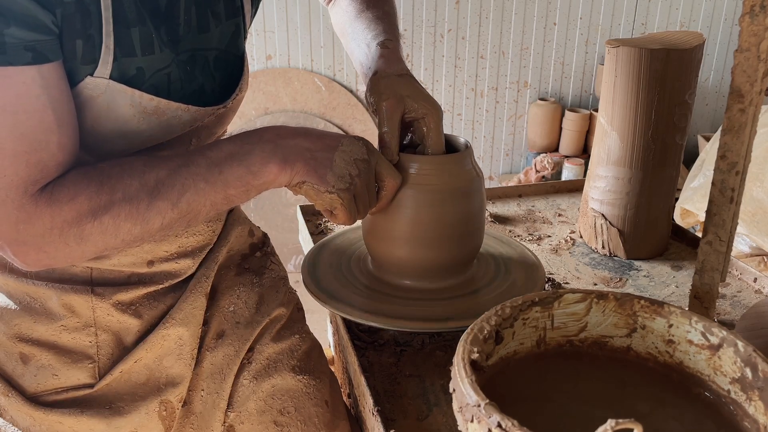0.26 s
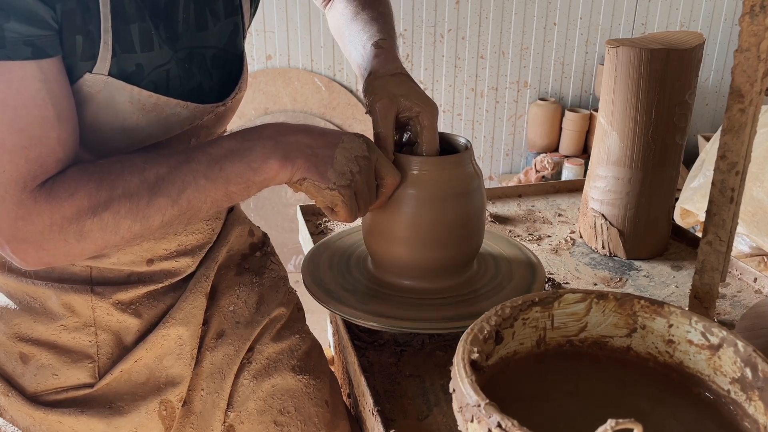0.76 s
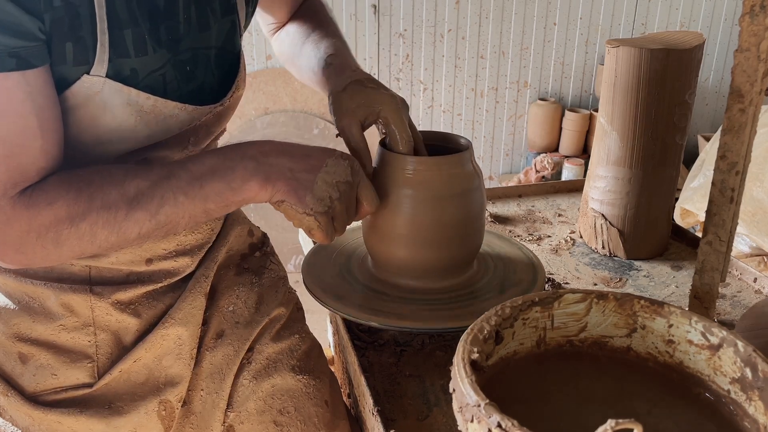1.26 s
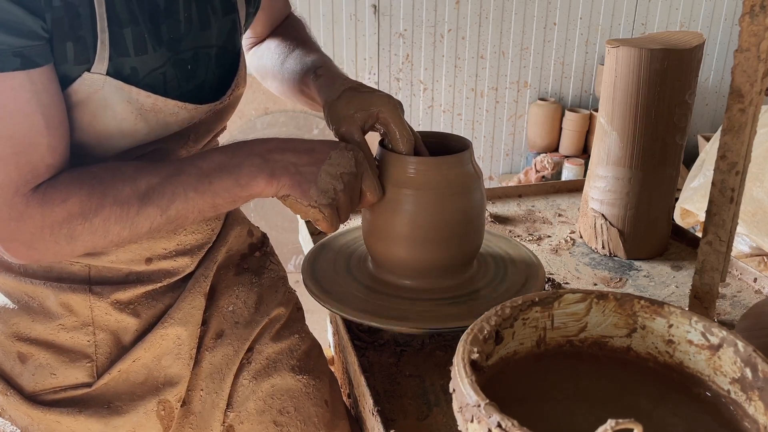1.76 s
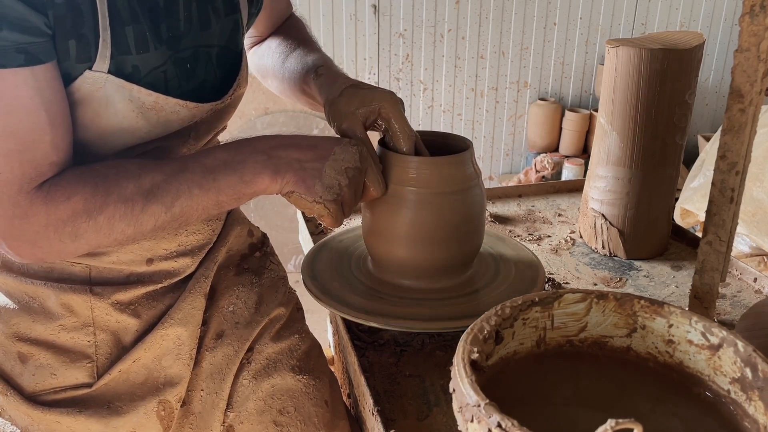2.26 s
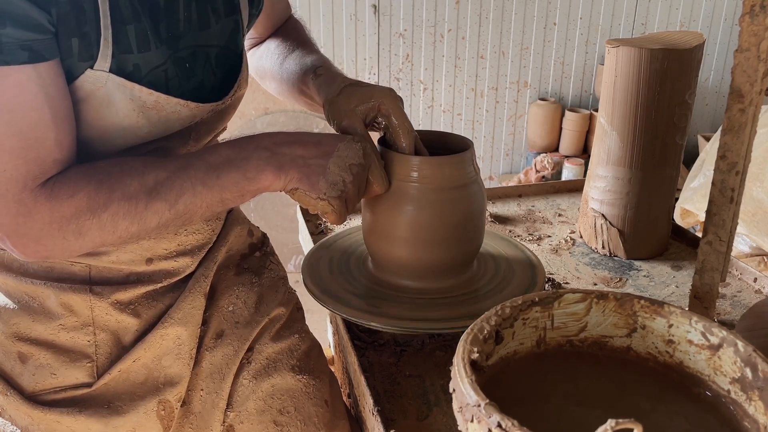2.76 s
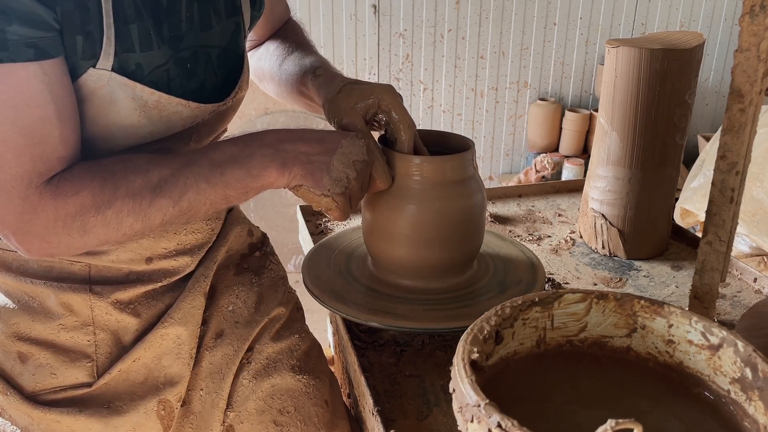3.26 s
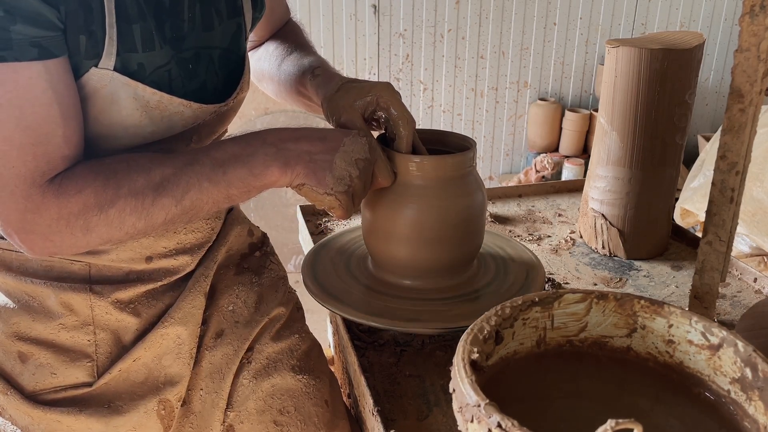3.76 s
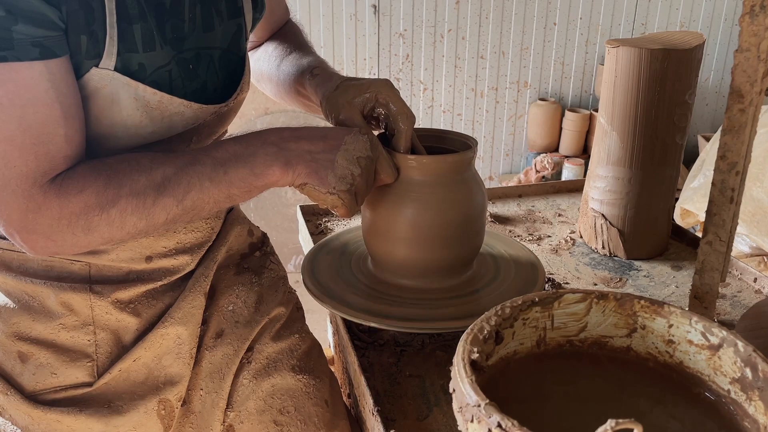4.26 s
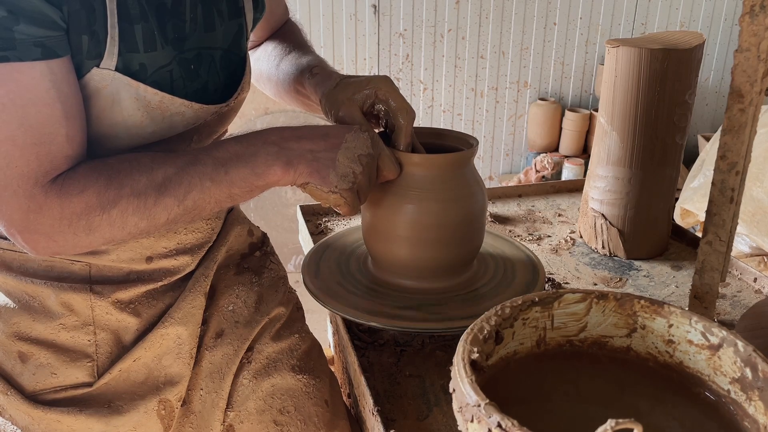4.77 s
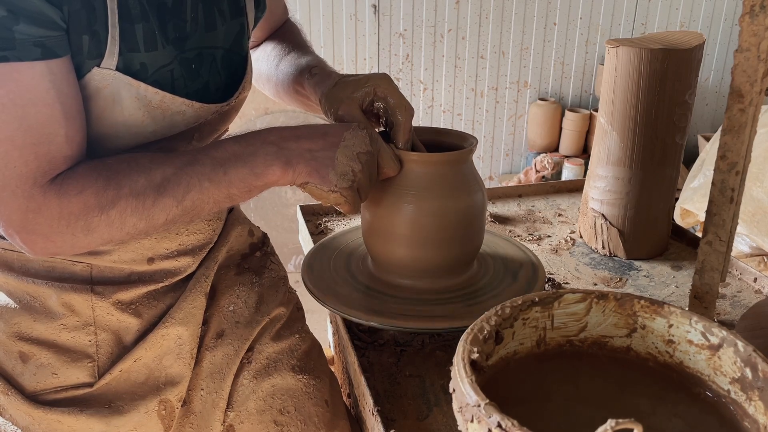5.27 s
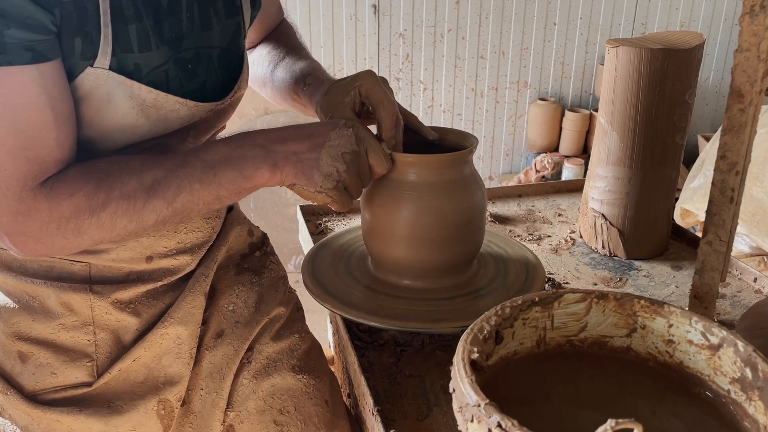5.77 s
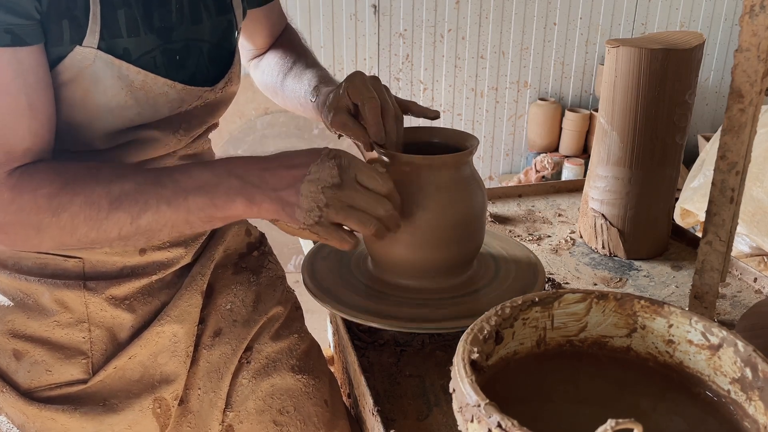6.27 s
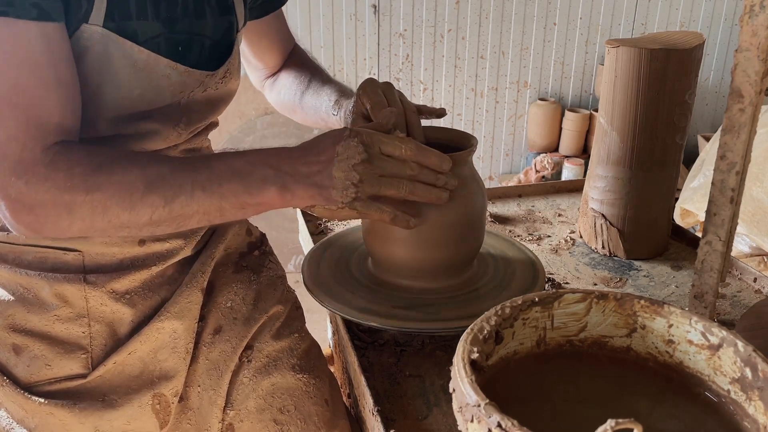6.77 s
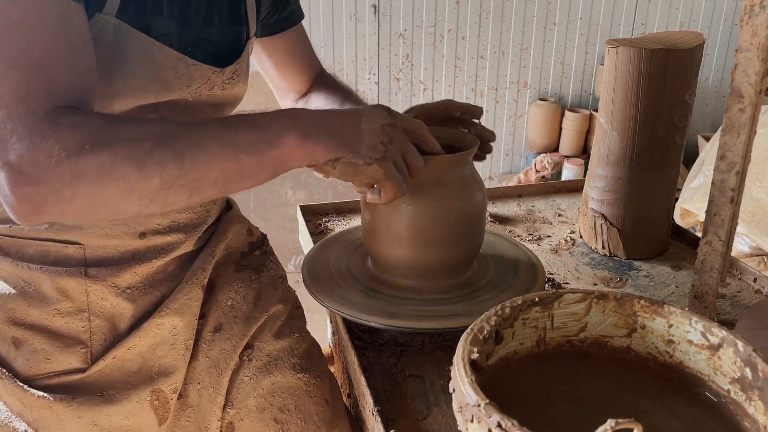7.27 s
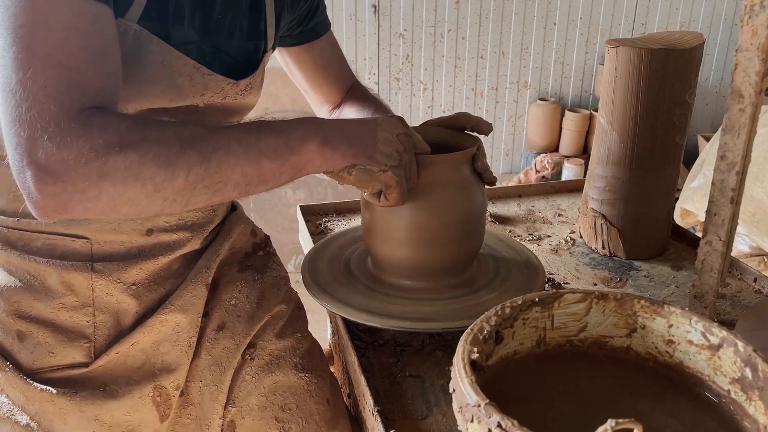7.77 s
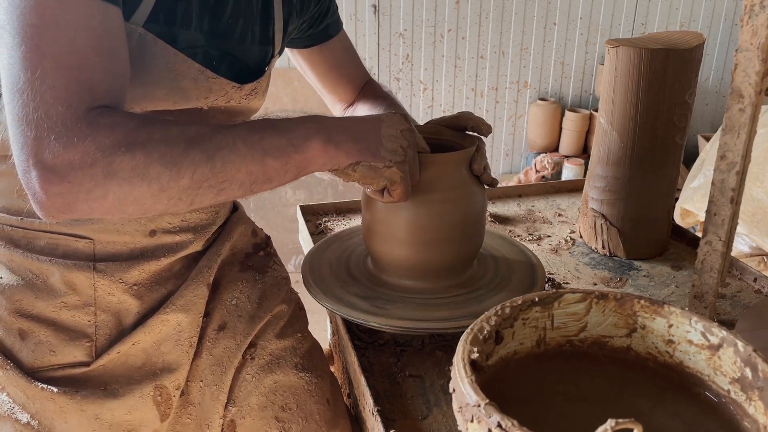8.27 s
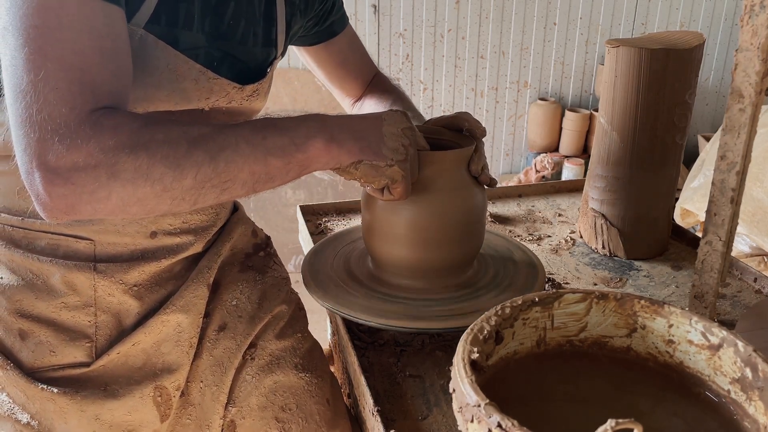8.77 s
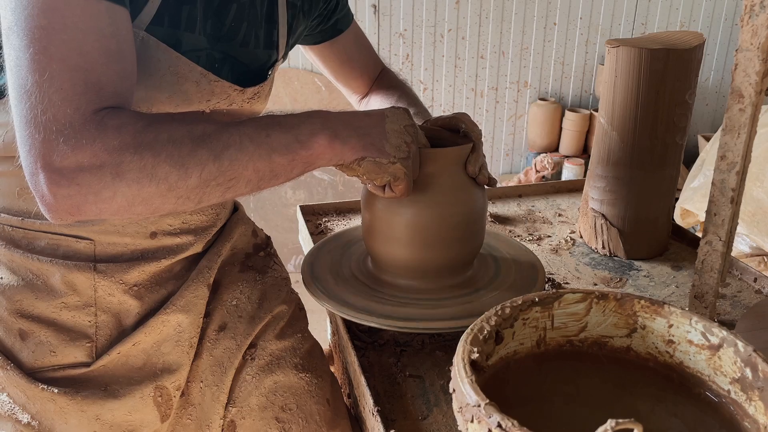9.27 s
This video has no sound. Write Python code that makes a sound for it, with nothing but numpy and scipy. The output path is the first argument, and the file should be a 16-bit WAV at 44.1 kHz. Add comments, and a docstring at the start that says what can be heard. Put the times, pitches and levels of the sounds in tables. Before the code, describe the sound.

An electric pottery wheel hums and whirrs steadily while wet fingers swish and sizzle rhythmically against turning clay in a workshop.

```python
"""Electric potter's wheel running steadily in a workshop while wet hands shape a pot.
Motor: sines on multiples of shaft speed plus mains hum; drive and bearings: noise through resonances.
Clay: filtered noise swishing under the fingers, a thin sizzle and short wet rubs about 2.5 times a second,
now and then a caught lump. Near the end the hands close round the neck and the wheel turns a little faster.
Background: faint, slightly restless workshop hiss."""
import sys
import numpy as np
from scipy import signal
from scipy.fft import rfft, irfft
from scipy.io import wavfile

SR = 44100
rng = np.random.default_rng(int(sys.argv[2]) if len(sys.argv) > 2 else 0)


def generate_wav(sig):
    """Save sig (samples, or channels by samples) to the path in sys.argv[1] as 16-bit PCM at SR."""
    pcm = np.round(np.clip(np.atleast_2d(sig).T, -1, 1) * 32767).astype(np.int16)
    wavfile.write(sys.argv[1], SR, pcm)


N = 420273
TIME_S = np.arange(N) / SR
FREQ_HZ = np.maximum(np.arange(N // 2 + 1) * SR / N, 1)

# Motor hum. Each row: multiple of the shaft speed, level in dB.
HUM_ORDER_DB = [(5, -33.5), (6, -53.5), (8, -35), (9, -74), (10, -48.5), (11, -32.5), (12, -39.5),
                (13, -48.5), (14, -50.5), (16, -50.5), (18, -45), (19, -74), (21, -63.5), (28, -60),
                (32, -65), (35, -65), (37, -71)]
# Belt and bearing tones. Each row: frequency in Hz, level in dB, change when the wheel runs freer in dB.
WHINE_HZ_DB = [(277.8, -36, -8.5), (420, -51.5, -6), (694, -61.5, -6), (877, -64, 5), (927, -65.5, 1),
               (1158.5, -63, -1), (1574, -66, 3), (1644.5, -65.5, 4), (1900, -64.5, 2), (1980.7, -68.5, -5),
               (2032, -68.5, 0), (2080, -72, -5), (2204, -68, -1)]
# Shaft overtone of the loaded motor: multiple of shaft speed, level in dB, change when freer in dB.
LOAD_WHINE_ORDER_DB = (36, -54, -6)
# Mains hum: level in dB of the first and of the second multiple.
MAINS_DB = [-64, -36.5]
# Resonances of frame and tray. Each row: centre in Hz, width in Hz, density in dB per Hz before trim.
FRAME_MODES = [(50, 9, -63.5), (69.5, 8.2, -57), (94.5, 18, -60.5), (111.2, 9.8, -50), (117.3, 15.7, -51.5),
               (138, 5.5, -53.5), (143, 10, -59), (167, 12, -61.5), (180, 11.5, -53), (197, 14, -53),
               (207, 24, -58), (220.5, 3.5, -57.5), (240.8, 14.2, -52.5), (254.5, 21, -56),
               (265.3, 7.1, -50), (280.8, 7.6, -47.5), (292.6, 24.5, -51), (308, 61, -59.5),
               (341.7, 16, -60), (373, 30, -65.5), (406, 12, -69), (419, 9.4, -53.5), (429.6, 11, -53.5),
               (453, 35, -60.5), (471.5, 9.9, -63.5), (480, 11, -68)]
# Resonances of the bearing housing. Each row: centre in Hz, width in Hz, density in dB per Hz before trim.
HOUSING_MODES = [(541, 11, -71.5), (579, 216, -74.5), (612, 26, -76.5), (691, 47, -68.5), (785, 120, -83.5),
                 (845, 52, -76.5), (875.6, 23, -67.5), (940, 45, -73), (1000, 270, -77.5),
                 (1084, 47, -74.5), (1160, 33, -71), (1240, 76, -81), (1315, 66, -75), (1480, 45, -80),
                 (1571, 40, -74), (1651, 106, -75.5), (1905, 52, -77.5), (2030, 94, -77.5),
                 (2250, 390, -88)]
# Rumble and whirr when the wheel runs freer. Each row: frequency in Hz, change in dB.
FAST_HZ_DB = [(70, 1), (115, 4.5), (138, -3), (180, 3.5), (220, -1), (245, 3), (280, -1), (315, 3),
              (450, -0.5), (700, 0), (900, -0.5), (1150, 2.5), (1400, 2), (1490, 5.5), (1580, 1.5),
              (1800, 1.5), (2100, -2.5)]
# Machine bands throbbing with the wheel. Each row: centre in Hz, width in Hz, swells per turn,
# first peak in turns, swing in dB.
THROBS = [(110, 70, 3, .07, .7), (110, 70, 1, .2, .6), (285, 60, 3, .08, .8), (695, 80, 1, .45, 1.6),
          (900, 110, 1, .35, .7), (1160, 70, 3, .02, 2.2)]
# Stereo image of the machine. Each row: frequency in Hz, side minus mid in dB.
SIDE_HZ_DB = [(60, -46), (110, -18), (200, -16.5), (380, -8.5), (700, 2), (1290, 0), (2380, -1), (4400, 22),
              (8120, 13), (15000, 7)]

# Finger strokes along the wall. Each row: start in seconds, length in seconds, level in dB.
STROKES_S_DB = [(-.2, 2.7, -57), (2.803, 1.054, -46.5), (3.66, 0.1, -45.5), (4.376, 0.81, -55.5),
                (5.239, 0.51, -49.5), (5.794, 1.3, -53.5), (6.37, 0.23, -51.5), (7.13, 0.16, -52.5),
                (7.386, 0.2, -45), (9.19, .5, -52)]
# Finger pressure. Each row: time in seconds, sizzle level in dB.
PRESS_S_DB = [(0, -47), (.8, -48), (1.6, -43.5), (2, -39), (2.8, -43), (3.2, -45.5), (3.6, -43.5),
              (4.4, -42), (5.2, -37.5), (5.6, -38), (6.4, -43), (6.8, -41.5), (7.15, -43), (7.55, -47),
              (7.85, -60), (9.53, -62)]
# Lumps caught under the finger. Each row: start in seconds, body level in dB before trim,
# length in seconds, level of the crisp start in dB.
CATCHES = [(.066, -48, .059, -53), (1.322, -51, .03, -42), (1.618, -52, .034, -58),
           (1.717, -40.5, .055, -41), (2.03, -47, .036, -51), (2.122, -42, .046, -40),
           (2.527, -44.5, .039, -47), (4.506, -47, .053, -52), (4.905, -40, .043, -39.5),
           (5.312, -43.5, .04, -42), (5.716, -43, .054, -46), (6.02, -44, .035, -56),
           (6.523, -46, .035, -42), (6.914, -48, .033, -49), (7.298, -40.5, .035, -47),
           (7.35, -43, .2, -50), (7.612, -52, .05, -49), (7.965, -48.5, .09, -48), (8.332, -46, .12, -48),
           (8.702, -47, .11, -46.5), (9.058, -46, .11, -47), (9.41, -47, .08, -45)]
# High spots of the wall. Each row: place in the turn 0-1, length in seconds, level on the belly in dB,
# level on the neck in dB; both levels before pressure and trim.
SPOTS = [(.08, .052, -51, -54), (.47, .03, -70, -51), (.71, .03, -60, -48.5), (.89, .05, -55, -60)]
# Both hands round the neck. Each row: time in seconds, sizzle level in dB.
COLLAR_S_DB = [(7.1, -90), (7.3, -58), (7.7, -64), (7.9, -56.5), (8.4, -57), (8.9, -53.5), (9.53, -53)]

# Spectrum of the finger swish. Each row: frequency in Hz, level in dB.
SLIDE_HZ_DB = [(600, -16), (1800, -2), (2800, 0), (4200, -1.5), (5500, -4), (7000, -4), (8300, -8),
               (9500, -7.5), (12000, -11), (13500, -15), (16000, -24)]
# Spectrum of the sizzle. Each row: frequency in Hz, level in dB.
SIZZLE_HZ_DB = [(3000, -36), (6000, -22), (8000, -17), (9500, -20), (11000, -17), (13100, -11),
                (14200, -3.5), (15250, 0), (15700, -1), (16000, -5)]
# Spectrum of dull rubbing. Each row: frequency in Hz, level in dB.
SCRAPE_HZ_DB = [(3000, -24), (4400, -11), (5400, 0), (6700, -1), (8000, -2), (9500, -5), (13000, -9),
                (15200, -13)]
# Spectrum of crisp, wet contact. Each row: frequency in Hz, level in dB.
CRISP_HZ_DB = [(4000, -24), (5500, -9), (8000, -6), (10500, -1.5), (12500, 1), (14000, -5), (16000, -9)]
# Spectrum of the workshop air. Each row: frequency in Hz, level in dB.
AIR_HZ_DB = [(20, 5), (300, 3), (2400, 1), (2750, -2), (3100, -4), (3800, -2), (4300, -6), (4900, -1.5),
             (5800, -6.5), (7400, -5.5), (8200, -45), (9500, -6), (13000, -14), (16000, -21)]
# Hiss at the two microphone ports. Each row: frequency in Hz, phase lead of the left in radians,
# coherence 0-1, left minus right in dB.
PORTS = [(100, 0, .9, 1), (2600, -.5, .6, 2.5), (4000, 0, .6, 2.5), (5000, -.5, .6, 2.5), (6500, .7, .6, 2),
         (8200, 3.1, .9, 0), (9500, 4.8, .85, 0), (11400, 6.3, .85, 0), (13000, 7.4, .7, 0),
         (14700, 9.4, .92, 0), (16000, 9.8, .9, 0)]
# Narrow treble resonances of hollows round the wheel. Each row: centre in Hz, width in Hz, boost in dB.
HOLLOWS_HZ_DB = [(2780, 200, 2), (3400, 200, 2), (4900, 300, 2.5), (5470, 130, 6), (6120, 170, 4),
                 (6950, 250, 2.5), (7950, 200, 3), (10520, 130, 3), (12200, 250, 2), (12860, 130, 4)]
# Early echoes from pot, tray and bucket. Each row: delay in seconds, gain.
ECHOES_S_GAIN = [(.00512, .2), (.01188, .25), (.0192, .15)]

SHAFT_HZ, MAINS_HZ = 24.856, 49.985
SMEAR_RAD = np.pi / 18  # phase delay per squared order: spreads each shaft kick over the turn
BEAT_DB, BEAT_DIP_S = 2.8, 1.25
TURN_S = .3987  # before the wheel runs freer
NECK_S, SPEED_GAIN_SHARE, SPEED_UP_S = 7.6, .105, .2
STROKE_ATTACK_S, STROKE_RELEASE_S = 0.56, 0.31
POPS_PER_S, POP_DB, POP_SCATTER_DB, POP_HZ, POP_WIDTH_HZ = 900, -59, 2, 5500, 3800
SIZZLE_WIDTH_S, SIZZLE_PEAK_DB, SIZZLE_REST_DB = 0.041, -0.5, -33  # relative to pressure
SIZZLE_SKIRT_S, SIZZLE_SKIRT_DB = 0.046, -9  # lighter contact before and after the swell
TURN_SCATTER_DB = 1.1
RUB_PRESS_SHARE = 0.27  # share of the pressure's dB that rubbing follows
BODY_LAG_S = .008
CRISP_ATTACK_S, CRISP_DECAY_S = .002, .014
CRISP_LENGTH_SHARE = .27  # share of the catch's length added to the decay
AIR_DB = -50
TOP_HZ = 15850


def undb(db):
    """Decibels to gain."""
    return 10 ** (np.asarray(db) / 20)


def curve(rows):
    """A time table's value at every sample."""
    rows = np.array(rows)
    return np.interp(TIME_S, rows[:, 0], rows[:, 1])


def over_freq(rows, axis=1):
    """One column of a frequency table at every bin, on a log frequency scale."""
    rows = np.array(rows)
    return np.interp(np.log(FREQ_HZ), np.log(rows[:, 0]), rows[:, axis])


def band(hz, width_hz):
    """Bell-shaped share of every bin around a centre."""
    return np.exp(-(2 * (FREQ_HZ - hz) / width_hz) ** 2)


def white():
    """Spectrum of fresh white noise."""
    return rfft(rng.standard_normal(N))


def walk(rate_hz):
    """Smooth random curve, mean 0 and spread 1, moving about rate_hz times a second."""
    x = irfft(white() * np.exp(-(FREQ_HZ / rate_hz) ** 2), N)
    return (x - x.mean()) / x.std()


def grain(rough_db, rate_hz):
    """Gain of tiny slips and bursting water films: uneven, mean power 1."""
    gain = undb(rough_db * walk(rate_hz))
    return gain / np.sqrt(np.mean(gain ** 2))


def ramp(middle_s, length_s):
    """Smooth step from 0 to 1, half way up at middle_s."""
    return .5 + .5 * np.sin(np.pi * np.clip((TIME_S - middle_s) / length_s, -.5, .5))


def brush(age_s, length_s, rise=0.38):
    """Swell and fade of a spot passing under the hand; peaks at the rise share of its length."""
    swell = age_s / (rise * length_s)
    return swell * np.exp(1 - swell)


def hiss(colour):
    """Coloured stereo noise of rms 1: hollows boost it, echoes ripple it, the two ports decorrelate it."""
    lead_rad = over_freq(PORTS)
    coherence = over_freq(PORTS, axis=2)
    tilt_db = over_freq(PORTS, axis=3)
    shared = np.sqrt(coherence) * white()
    ports = []
    for sign in (1, -1):  # left, right
        own = np.sqrt(1 - coherence) * white()
        port = shared * np.exp(1j * sign * lead_rad / 2) + own
        ports.append(port * undb(sign * tilt_db / 2))
    ring_db = sum(db / (1 + (2 * (FREQ_HZ - hz) / width_hz) ** 2) for hz, width_hz, db in HOLLOWS_HZ_DB)
    ripple = 1 + sum(gain * np.exp(-2j * np.pi * FREQ_HZ * delay_s) for delay_s, gain in ECHOES_S_GAIN)
    x = irfft(np.array(ports) * ripple * undb(over_freq(colour) + ring_db), N)
    return x / x.std()


def freed():
    """0 while the hands brake the belly of the pot, 1 once they are at its neck."""
    return ramp(NECK_S, SPEED_UP_S)


def turns():
    """Turns the wheel has made: integral of its speed."""
    return np.cumsum(1 + SPEED_GAIN_SHARE * freed()) / (SR * TURN_S)


def sway(order, lag_turns):
    """Cosine repeating order times a turn, peaking lag_turns after the sizzle."""
    return np.cos(2 * np.pi * order * (turns() - lag_turns))


def each_turn(scatter_db):
    """Random gain drawn anew for every turn."""
    count = (turns() + .5).astype(int)
    return undb(scatter_db * rng.standard_normal(count.max() + 1))[count]


def machine(rumble_db=-0.84, whirr_db=-1.06, hum_db=0, pan_db=0.84, lurch_db=0.5):
    """Hum, low rumble and bearing whirr, swaying as the wheel turns."""
    rumble_gain = undb(rumble_db + lurch_db * sway(order=2, lag_turns=0.13))
    rumble = frame(FRAME_MODES, throb_db=0.46, throb_hz=8.0) * rumble_gain
    whirr = frame(HOUSING_MODES, throb_db=0.63, throb_hz=29) * undb(whirr_db)
    mix = throb(undb(hum_db) * motor() + rumble + whirr)
    return mix * undb([[pan_db / 2], [-pan_db / 2]])


def motor(wander=0.00066, flutter=0.15, slip_hz=0.58):
    """Shaft harmonics share a wandering speed; belt and bearing tones also slip about; mains hum is steady in pitch."""
    clock_s = TIME_S + np.cumsum(wander * walk(3.64)) / SR
    side_gain = undb(over_freq(SIDE_HZ_DB))
    fast = freed()
    order, loaded_db, eased_db = LOAD_WHINE_ORDER_DB
    tones = [(k * SHAFT_HZ, db, 0) for k, db in HUM_ORDER_DB]
    tones.append((order * SHAFT_HZ, loaded_db + eased_db * fast, 0))
    for hz, db, fast_db in WHINE_HZ_DB:
        slip_cycles = np.cumsum(slip_hz * walk(2.06)) / SR
        tones.append((hz, db + fast_db * fast, slip_cycles))
    out = np.zeros((2, N))
    for hz, db, slip_cycles in tones:
        phase = 2 * np.pi * (hz * clock_s + slip_cycles) - SMEAR_RAD * (hz / SHAFT_HZ) ** 2
        side = np.interp(hz, FREQ_HZ, side_gain) * np.cos(phase)
        stereo = np.sin(phase) + np.outer([1, -1], side)
        out += undb(db) * (1 + flutter * walk(2.5)) * stereo
    # doubled mains swells and dips at its difference from the shaft's fourth multiple
    beat_hz = 2 * MAINS_HZ - 4 * SHAFT_HZ
    beat_db = -BEAT_DB * np.cos(2 * np.pi * beat_hz * (TIME_S - BEAT_DIP_S))
    for k, db in enumerate(MAINS_DB, 1):
        tone = np.sin(2 * np.pi * (k * MAINS_HZ * TIME_S + rng.random()))
        out += undb(db + beat_db * (k == 2)) * tone
    return np.sqrt(2) * out  # table levels are rms


def frame(modes, throb_db, throb_hz):
    """Countless small drive knocks, as noise, ring the modes in uneven surges; a freer wheel favours other modes."""
    power = 0
    for hz, width_hz, db in modes:
        detune = (FREQ_HZ / hz - hz / FREQ_HZ) * hz / width_hz
        power = power + undb(db) ** 2 / (1 + detune ** 2) ** 2
    side = white() * undb(over_freq(SIDE_HZ_DB))
    spectrum = (white() + np.outer([1, -1], side)) * np.sqrt(power * SR / 2)
    slow = irfft(spectrum, N)
    fast = irfft(spectrum * undb(over_freq(FAST_HZ_DB)), N)
    return (slow + (fast - slow) * freed()) * undb(throb_db * walk(throb_hz))


def throb(x):
    """Load changes round the turn, so each band of the machine swells in its own rhythm."""
    spectrum = rfft(x)
    out = x
    for hz, width_hz, times, peak_turns, db in THROBS:
        part = irfft(spectrum * np.sqrt(band(hz, width_hz)), N)
        out = out + part * (undb(db * sway(order=times, lag_turns=peak_turns)) - 1)
    return out


def slide():
    """Uneven swish of fingers on slip with fine wet crackle; each stroke swells, holds and lets go."""
    power = 0
    for start_s, length_s, db in STROKES_S_DB:
        release = 1 - ramp(start_s + length_s, STROKE_RELEASE_S)
        power = power + undb(db) ** 2 * ramp(start_s, STROKE_ATTACK_S) * release
    size = np.sqrt(power)
    return hiss(SLIDE_HZ_DB) * size * grain(rough_db=1.0, rate_hz=45) + crackle(size)


def crackle(size):
    """Tiny films of slip burst at random, more often the harder the fingers rub."""
    chance = POPS_PER_S / SR * size / size.mean()
    pops = (rng.random(N) < chance) * undb(POP_SCATTER_DB * rng.standard_normal(N))
    signed = pops * rng.choice([-1, 1], (2, N))
    x = irfft(rfft(signed) * band(POP_HZ, POP_WIDTH_HZ), N)
    return undb(POP_DB) * x / x.std()


def sizzle(trail_db=-6, trail_s=0.044):
    """Rubbing tightens once a turn into a thin, high, uneven sizzle; a little trails each catch."""
    off_s = ((turns() + .5) % 1 - .5) * TURN_S
    swell = undb(SIZZLE_PEAK_DB) * each_turn(TURN_SCATTER_DB) / (1 + (off_s / SIZZLE_WIDTH_S) ** 2)
    skirt = undb(SIZZLE_SKIRT_DB) * np.exp(-(off_s / SIZZLE_SKIRT_S) ** 2)
    size = undb(curve(PRESS_S_DB)) * np.hypot(swell, undb(SIZZLE_REST_DB) + skirt)
    trail = sum(undb(edge_db + trail_db) * brush(np.maximum(TIME_S - start_s, 0), trail_s)
                for start_s, _, _, edge_db in CATCHES)
    slips = grain(rough_db=2.2, rate_hz=400) * grain(rough_db=2.2, rate_hz=35)
    return hiss(SIZZLE_HZ_DB) * np.hypot(size, trail) * slips


def scrapes(soft_db=-1.9, crisp_db=0.0, rub_crisp_db=-9):
    """High spots rub softly every turn; caught lumps start crisply, then a duller body follows."""
    rub = rubs()
    body = rub
    edge = undb(rub_crisp_db) * rub
    for start_s, body_db, length_s, edge_db in CATCHES:
        age_s = np.maximum(TIME_S - start_s, 0)
        body_age_s = np.maximum(age_s - BODY_LAG_S, 0)
        body = np.hypot(body, undb(body_db) * brush(body_age_s, length_s, rise=0.36))
        decay_s = CRISP_DECAY_S + CRISP_LENGTH_SHARE * length_s
        edge = edge + undb(edge_db) * (1 - np.exp(-age_s / CRISP_ATTACK_S)) * np.exp(-age_s / decay_s)
    dull = undb(soft_db) * body * hiss(SCRAPE_HZ_DB) * grain(rough_db=2.2, rate_hz=400)
    bright = undb(crisp_db) * edge * hiss(CRISP_HZ_DB) * grain(rough_db=0.5, rate_hz=420)
    return dull + bright


def rubs():
    """Rubbing level as each high spot comes round; grows with pressure."""
    press_db = curve(PRESS_S_DB)
    press_db = RUB_PRESS_SHARE * (press_db - press_db.mean())
    level = 0
    for place, length_s, belly_db, neck_db in SPOTS:
        age_s = (turns() - place) % 1 * TURN_S
        spot_db = belly_db + (neck_db - belly_db) * freed() + press_db
        level = level + brush(age_s, length_s) * undb(spot_db)
    return level


def collar(wet_db=-8):
    """Neck running through both hands: sizzle all the way round that sticks and slips, over a wetter hiss."""
    slips = grain(rough_db=2.2, rate_hz=24) * grain(rough_db=2.0, rate_hz=400)
    return undb(curve(COLLAR_S_DB)) * slips * (hiss(SIZZLE_HZ_DB) + undb(wet_db) * hiss(CRISP_HZ_DB))


def air():
    """Workshop hiss: coloured noise with a slight random flicker in level."""
    return undb(AIR_DB) * hiss(AIR_HZ_DB) * grain(rough_db=0.8, rate_hz=9.6)


def scene():
    """Machine and clay over the workshop's hiss."""
    return machine() + slide() + sizzle() + scrapes() + collar() + air()


def record(dry):
    """Elliptic low-pass cuts the top steeply."""
    return signal.sosfilt(signal.ellip(10, .2, 80, TOP_HZ, fs=SR, output="sos"), dry)


dry = scene()
out = record(dry)
generate_wav(out)
```